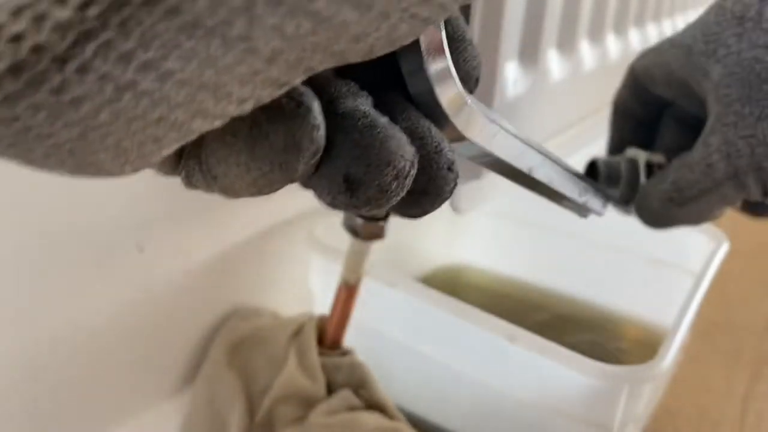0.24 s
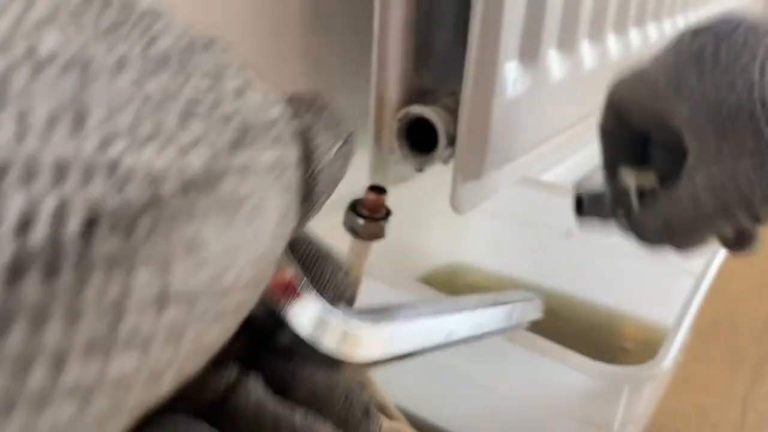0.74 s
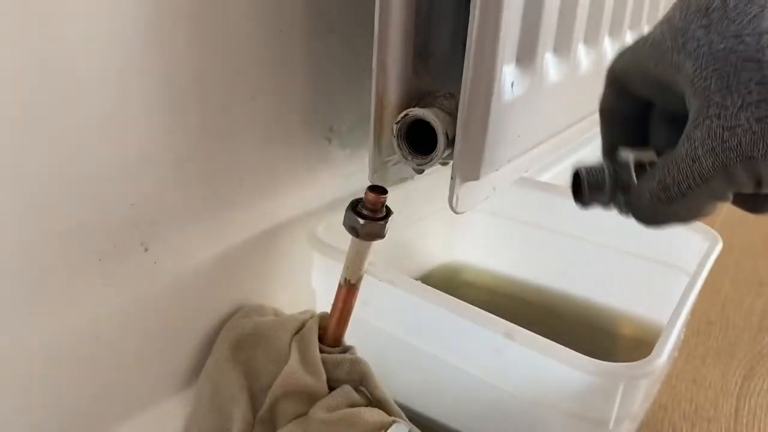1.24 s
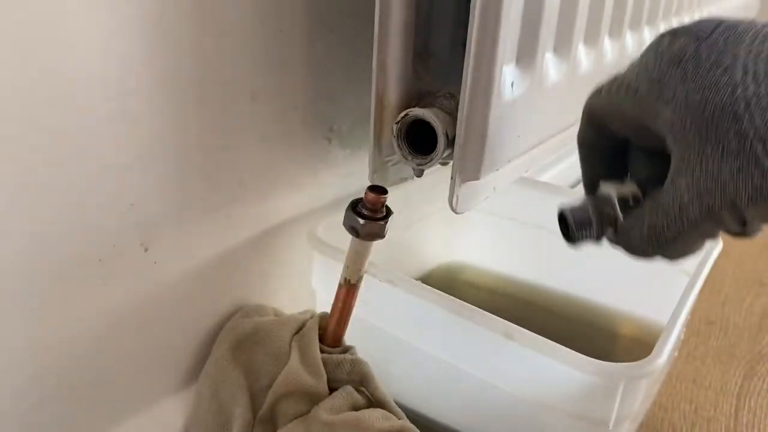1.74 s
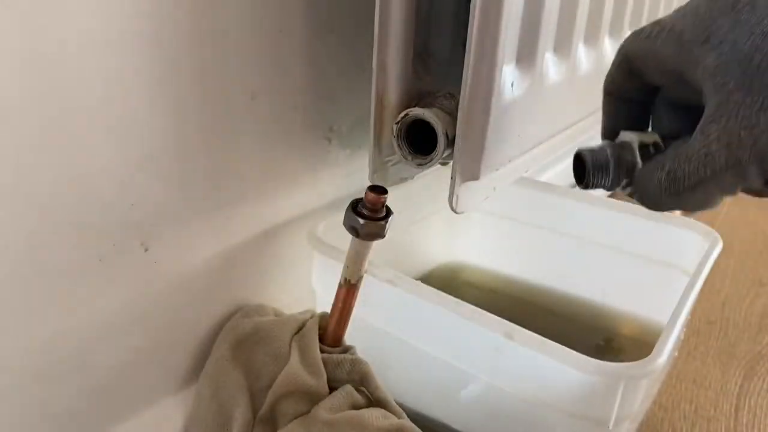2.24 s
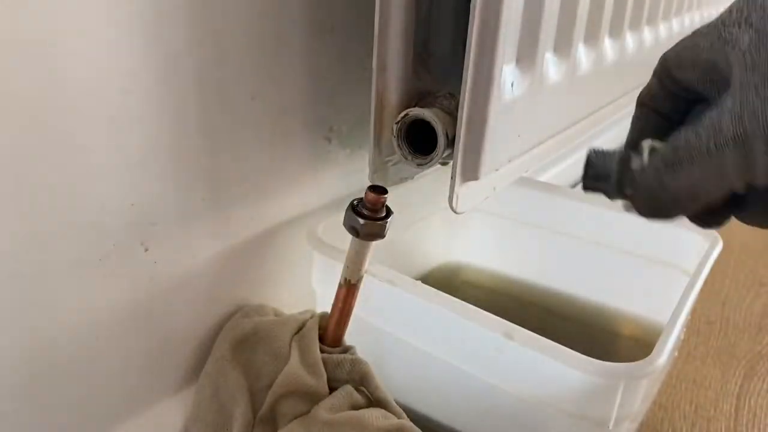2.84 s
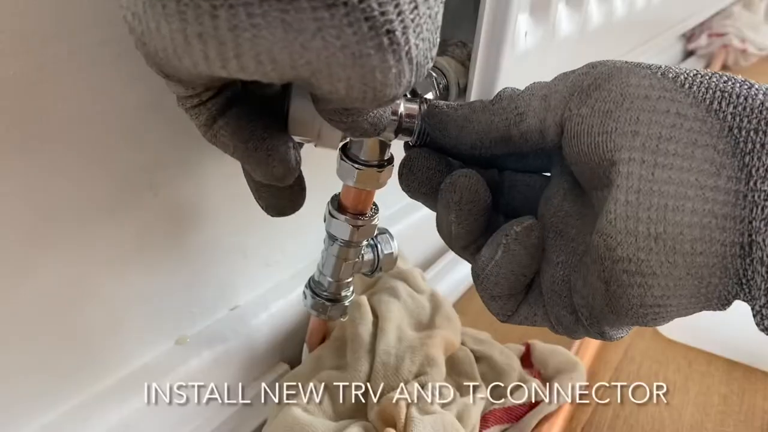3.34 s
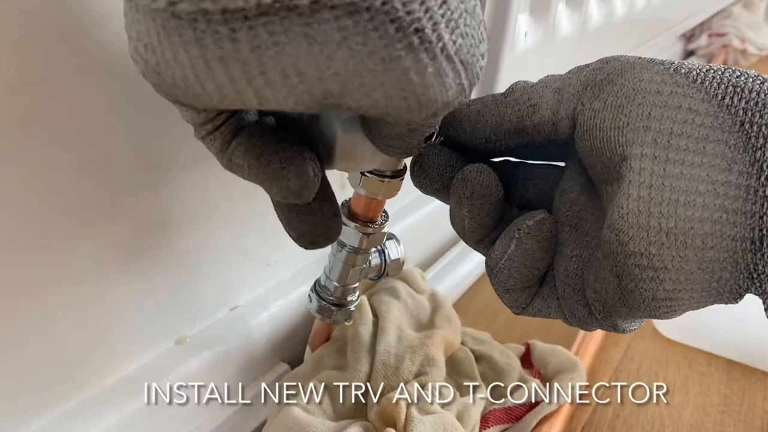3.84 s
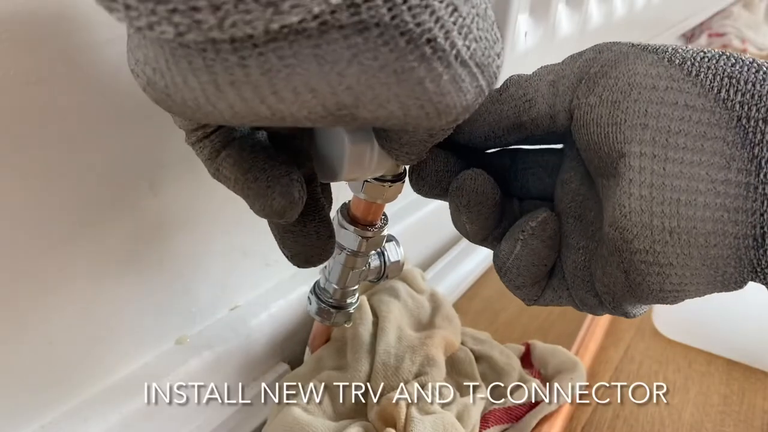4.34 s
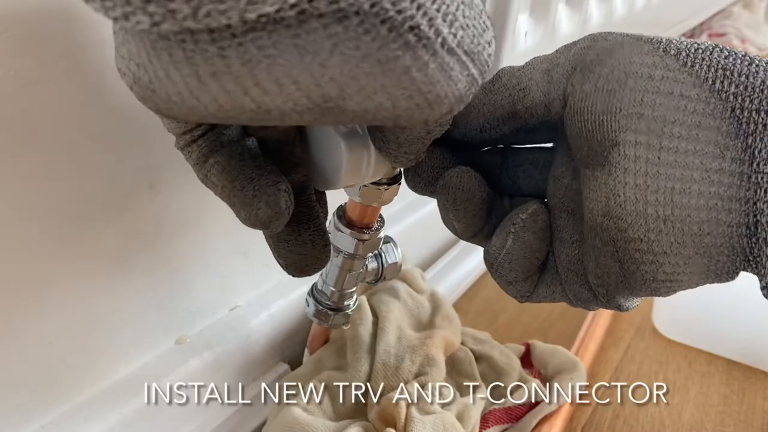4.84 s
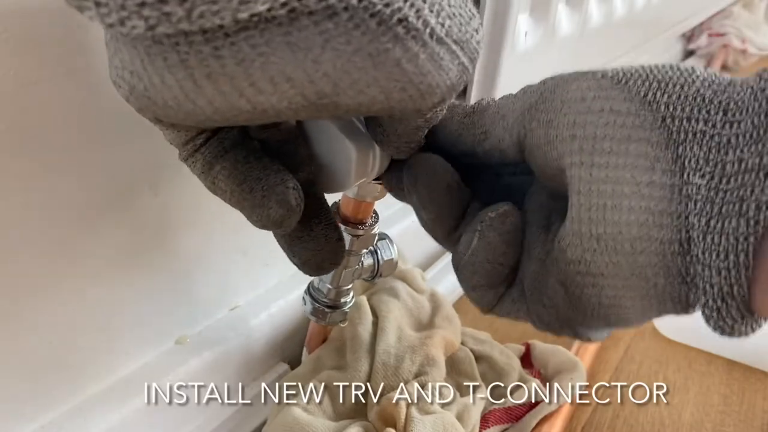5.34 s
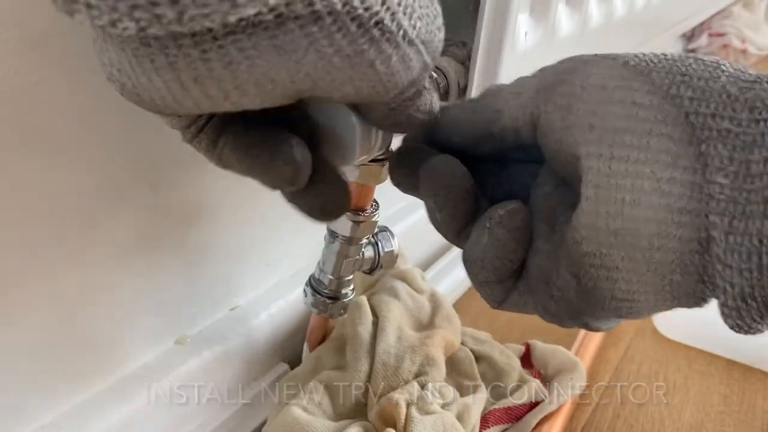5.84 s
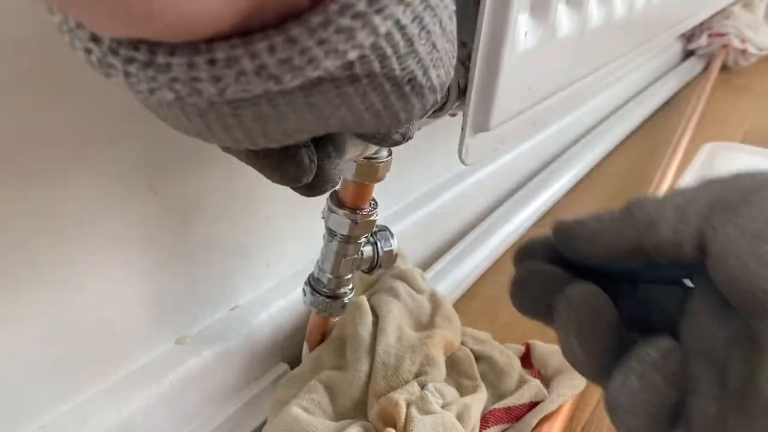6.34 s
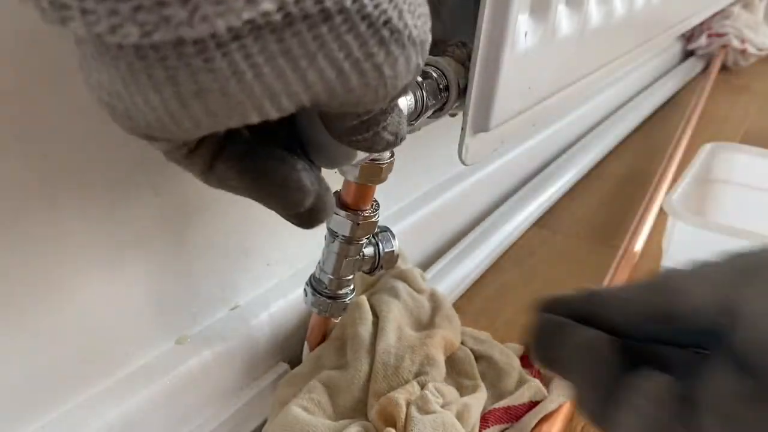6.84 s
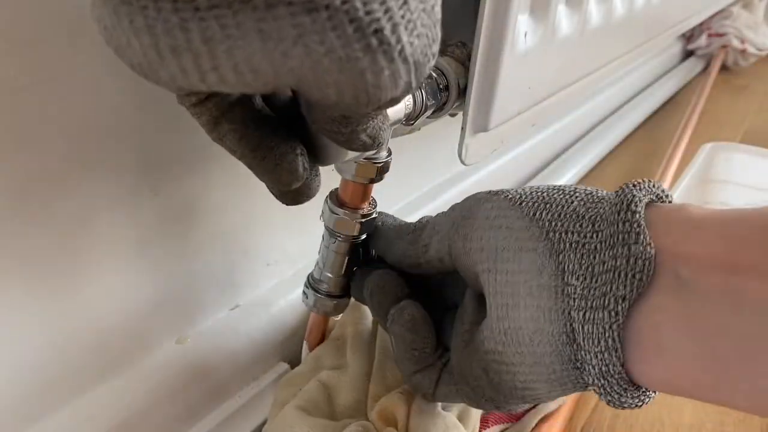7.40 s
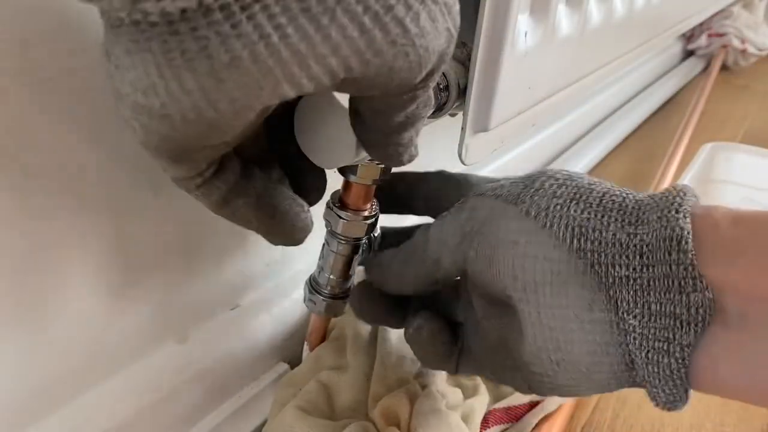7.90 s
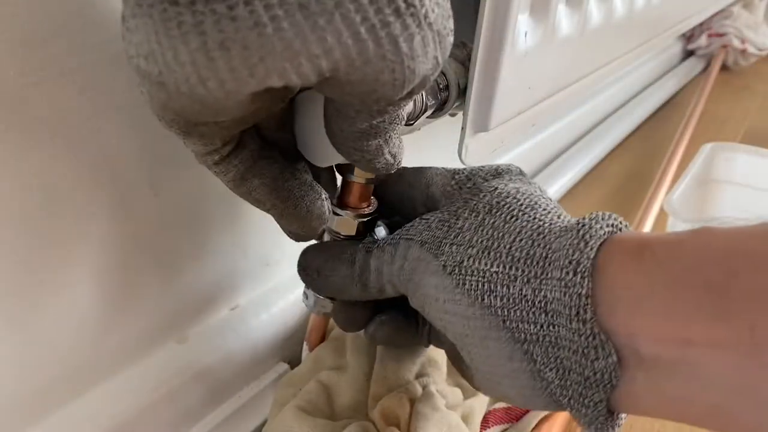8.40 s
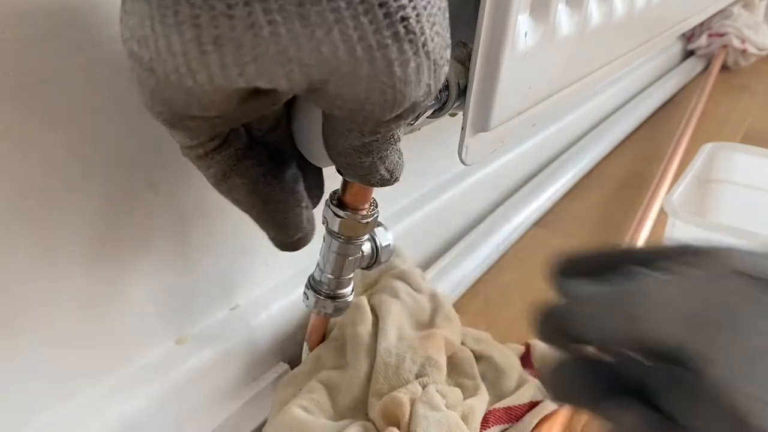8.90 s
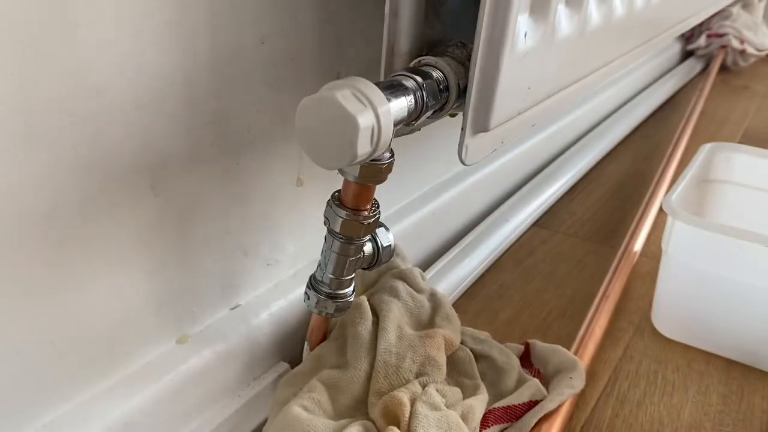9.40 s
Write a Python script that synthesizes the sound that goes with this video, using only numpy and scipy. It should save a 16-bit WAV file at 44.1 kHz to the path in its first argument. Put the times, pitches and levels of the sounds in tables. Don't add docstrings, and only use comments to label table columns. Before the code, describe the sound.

Small brass parts clink and rattle in gloved hands, a heavy tool thumps onto floorboards, then thin radiator steel knocks and booms indoors.

```python
import sys
import numpy as np
from scipy import signal
from scipy.fft import rfft, irfft, next_fast_len
from scipy.io import wavfile
from scipy.ndimage import uniform_filter1d

SR = 44100
rng = np.random.default_rng(int(sys.argv[2]) if len(sys.argv) > 2 else 0)


def invert_db(level):
    return 10 ** (np.asarray(level, dtype=float) / 20)


def to_wav(sig):
    pcm = np.clip(np.atleast_2d(sig), -1, 1) * 32767
    pcm = np.round(pcm).astype(np.int16)
    wavfile.write(sys.argv[1], SR, pcm.T)


N = 426006
LONG = next_fast_len(N)
CUT_S = 2.955

# (frequency [Hz], level [dB per Hz])
RUMBLE = [(15, -40), (30, -9), (204, -4), (376, -21), (560, -16.5), (1300, -33.5), (3790, -47.5),
          (9100, -74)]
# (time [s], level [dB], t60 [s])
SWAYS = [
    (3.1, -38, 0.39),
    (4.199, -34.5, 0.98),
    (4.55, -34, 0.69),
    (4.79, -39, 2.1),
    (4.999, -35.5, 1.63),
    (5.571, -40, 2.25),
    (6.11, -36.5, 1.26),
    (6.5, -48.5, 6.1),
    (8.201, -47, 0.63),
    (8.99, -45.5, 1.9),
]
# (frequency [Hz], t60 [s])
ROOM_DECAY = [(100, 0.86), (400, 0.057), (1500, 0.46), (5000, 0.37), (16000, 0.12)]
# (frequency [Hz], share [0-1])
LIKENESS = [(60, .995), (125, .98), (250, .9), (600, .05), (1100, .35), (2000, .4), (5000, .3)]

# (frequency [Hz], level [dB per Hz])
CLOTH = [(300, -3.5), (800, -13), (1700, -5), (2800, -4), (4500, -7.5), (6500, -9.5), (9000, -32.5)]
SHEEN = [(5000, -17.5), (7500, -5.5), (11000, -6), (14000, -7.5), (15500, -12)]
# (loudest [s], rise [s], fall [s], cloth level [dB], sheen level [dB])
STROKES = [(0, .1, 0.18, -66.5, -78.5), (0.733, 0.0088, 0.063, -49, -59), (0.981, 0.18, 0.22, -49.5, -61),
           (1.1, 0.4, 0.094, -50.5, -59), (1.439, 0.22, 0.63, -59, -69.5), (1.869, .3, 0.12, -68.5, -89),
           (2.348, 0.81, 0.28, -70.5, -80.5), (5.3, 0.22, 0.039, -84.5, -80),
           (5.472, 0.016, 0.73, -69, -77), (5.908, 0.46, 0.59, -70, -76), (6.521, 0.16, 0.27, -65, -73),
           (6.93, 0.18, 0.31, -66.5, -75), (7.499, 0.28, 0.18, -77, -80), (7.77, 0.13, 0.26, -76, -73.5),
           (8.05, 0.073, 0.24, -69, -72), (8.508, 0.31, 0.6, -87.5, -82.5), (8.72, 0.19, 0.049, -62, -68.5),
           (8.95, 0.076, 0.28, -57.5, -70.5), (9.3, 0.1, 0.25, -78, -64), (9.64, 0.82, 0.32, -59.5, -66)]
# (start [s], end [s], from [Hz], to [Hz], level [dB])
GLOVE_SQUEAK = (3.48, 3.56, 6350, 6700, -83)
# (time [s], length [s], low [Hz], high [Hz], level [dB rms])
SCUFFS = [(0.464, 0.031, 1500, 12000, -47.5), (1.307, 0.11, 2000, 5970, -72),
          (1.357, 0.058, 1494, 12700, -48.5), (1.428, 0.036, 880, 12830, -42),
          (1.477, .025, 1500, 12000, -59), (1.512, .02, 1500, 12000, -53), (2.71, 0.023, 3203, 4300, -43),
          (2.71, 0.018, 6300, 8030, -52), (2.736, 0.03, 2010, 12550, -43.5),
          (2.082, 0.051, 6450, 7650, -56), (5.143, 0.044, 2200, 2700, -54), (5.2, 0.036, 3147, 3500, -63),
          (5.194, 0.026, 500, 1700, -46.5), (4.526, .02, 1104, 1800, -46.5), (3.585, .035, 1000, 1680, -53),
          (3.72, 0.051, 1097, 4860, -49.5), (3.95, 0.037, 1100, 1905, -47), (3.12, 0.042, 1130, 1620, -53),
          (3.302, 0.025, 1150, 1550, -62), (8.496, 0.047, 600, 3940, -59.5),
          (2.774, 0.021, 1280, 12500, -48), (2.923, 0.02, 1280, 4480, -64), (6.534, 0.059, 800, 1630, -46),
          (6.912, 0.079, 1320, 1970, -60), (7.261, 0.22, 1230, 1860, -75.5), (7.499, 0.13, 1210, 2085, -73),
          (8.128, 0.085, 1300, 2370, -66.5), (8.909, 0.2, 4300, 4900, -70), (8.924, .05, 1600, 2700, -72),
          (8.982, 0.085, 1080, 1800, -51.5), (9.206, .07, 2100, 3000, -75), (9.3, 0.13, 1990, 2790, -69),
          (9.525, 0.032, 1220, 1970, -59.5), (9.58, 0.056, 2130, 3300, -63)]
# (time [s], length [s], low [Hz], high [Hz], level [dB rms])
TICKS = [(0.413, .003, 1500, 2400, -56), (0.423, 0.0028, 1500, 5460, -53.5),
         (1.217, .003, 2500, 15000, -64.5), (1.239, .002, 6000, 15000, -70.5),
         (1.271, 0.0025, 2500, 15000, -65.5), (1.293, 0.0029, 2500, 14900, -66),
         (1.338, 0.0035, 1500, 14600, -58.5), (1.592, 0.0025, 2010, 8000, -59.5),
         (1.648, .003, 1490, 12000, -53), (2.357, 0.0023, 1490, 7000, -65.5),
         (2.7, 0.0068, 2540, 12000, -66.5), (2.82, 0.0061, 1470, 12000, -55),
         (2.895, 0.0035, 3200, 4200, -54), (2.944, 0.0037, 1200, 12000, -56),
         (4.511, 0.0094, 400, 3500, -52), (6.686, 0.0054, 1083, 1700, -63.5),
         (7.196, 0.0053, 806, 2630, -67.5), (8.021, 0.0041, 1190, 2010, -66),
         (8.092, .005, 1300, 2080, -63), (8.16, 0.0058, 600, 2680, -53), (8.192, 0.0091, 794, 2180, -45.5),
         (2.482, 0.011, 3500, 4250, -57), (8.26, 0.0028, 9990, 15300, -72), (8.346, 0.0071, 700, 1800, -64),
         (8.571, 0.0022, 3970, 16000, -67), (8.584, 0.0024, 6000, 16000, -63),
         (9.281, 0.0031, 3200, 6500, -57), (9.645, 0.0043, 3800, 5500, -53.5),
         (9.281, 0.0081, 546, 1080, -51), (9.641, 0.0043, 1610, 2500, -53), (1.518, .008, 1497, 2187, -44),
         (0.229, 0.0052, 3260, 4200, -49), (.274, 0.0034, 3000, 4300, -51)]
# (time [s], frequency [Hz], level [dB])
PINGS = [
    (1.11, 1800, -41),
    (1.4343, 5330, -25),
    (5.753, 4820, -24.5),
    (5.146, 2400, -46),
    (5.147, 3290, -49),
    (6.537, 1360, -39),
    (6.934, 1740, -45.5),
    (8.646, 2574, -35),
    (9.541, 1490, -48.5),
    (9.563, 3000, -43.5),
]

# (frequency [Hz], level [dB], t60 [s])
FLOORBOARD = [(170, -10, .11), (265, -5.5, 0.14), (300, -2.5, .09), (400, -9.5, 0.12), (468.6, -8, 0.14),
              (544.5, -8.5, 0.12), (740, -4, 0.077), (870, -17, .12), (1140, -16, .1), (1320, -22, .1),
              (1800, -28.5, .1)]
KEY = [(2650, -3, .008), (3570, -3, .008), (4156, -23, .42), (5150, -14, .007)]
BRASS_MAIN = [(6500, -4.5, .008), (6870, -3.5, 0.027), (6920, -5, 0.016), (6920, -1.5, 0.011),
              (7680, -4, 0.0066)]
BRASS_LOW = [(3240, -5.5, 0.01), (3600, -0.5, 0.007), (3810, -1, 0.01), (4030, -7, .006),
             (5400, -11.5, 0.0042)]
BRASS_TOP = [(14600, -11.5, .22), (14800, -4, .06), (14680, -3.5, .04)]
BRASS_BODY = [(1500, -2, .005), (1850, 0, .007), (2400, -2, .005)]
BRASS_SHINE = [(9670, -2, 0.0042), (11150, -3.5, 0.006), (11430, -2, 0.015), (12000, -4, 0.0059)]
NUT = [(8750, -10.5, 0.16), (8770, 2, 0.15), (14910, -31.5, .2), (14900, -33.5, 0.036)]
# (time [s], peak [dB], ring near 3.8 kHz [dB], top ring [dB])
FREEING = [(0.2299, -46.5, -53.5, -79), (0.275, -54.5, -45.5, -72), (0.304, -34.5, -41, -62),
           (0.3296, -43.5, -41, -64), (0.337, -36, -39.5, -43), (0.4659, -24, -45, -36.5),
           (0.4705, -21.5, -44, -31.5), (0.5409, -30, -46.5, -45), (0.5774, -33, -42, -40),
           (0.589, -52, -51, -58), (0.7263, -48, -51, -71), (0.82, -42, -46, -68), (1.024, -45, -44, -62)]
RATTLING = [(1.361, -36.5, -43, -51), (1.376, -27.5, -47.5, -24), (1.3974, -36, -50, -48),
            (1.4287, -35, -62.5, -52.5), (1.4349, -37, -36.5, -45.5), (1.445, -39.5, -57, -58),
            (1.483, -41, -55.5, -55), (1.5189, -34.5, -45, -54), (1.6078, -46, -51.5, -60),
            (1.6527, -33.5, -44.5, -55), (1.663, -30, -46, -60)]
ROLLING = [(2.049, -40, -44, -43.5), (2.068, -32.5, -44, -55.5), (2.4269, -36.5, -46.5, -54.5),
           (2.453, -52.5, -53, -93), (2.4875, -47, -55.5, -89), (2.7116, -50, -43, -57.5),
           (2.7333, -25, -37.5, -39), (2.7422, -37.5, -42.5, -16), (2.777, -37.5, -44.5, -42.5),
           (2.8904, -43.5, -49, -61), (2.928, -59, -67, -81)]
# (freeing [dB], rattling [dB], rolling [dB])
BRASS_BODY_DB = (-3, 2, -3)

PANEL_HZ = [184, 281, 620, 845, 925, 1071, 1165, 1325, 1483, 1733, 2360, 2665, 3460, 4670]
# (level [dB], t60 [s])
PANEL_RING = [(-11, .3), (-7, .27), (-5, .25), (-8, .25), (-8, .13), (-8, .2), (-11, .2), (0, .19),
              (-6, .15), (-1, .17), (-5, .13), (-4, .1), (-7, .09), (-17, .08)]
# (frequency [Hz], level [dB], t60 [s])
SHEET = [(106, -11.5, 0.91), (203, -11, .6), (420, -6, 0.31), (1320, -9, 0.39), (3000, -4.5, 0.2),
         (5225, -5.5, 0.27), (7160, 9.5, 0.13), (16000, -2, 0.072)]
# (frequency [Hz], level [dB])
CROWD = [(400, -2), (700, 3), (1000, -6.5), (1600, -2), (2100, -1), (3400, -0.5), (4100, 2.5), (5000, 4)]
# (frequency [Hz], width [Hz], level [dB])
BUNCHES = [(920, 90, 2.5), (2050, 130, -3), (2550, 220, 4), (3050, 120, -4), (3420, 220, 3.5),
           (4250, 220, -4), (4680, 160, 1.5)]
# (time [s], frequency [Hz], level [dB])
FAVOURED = [(3.199, 3320, -43), (3.2, 2530, -50), (3.3, 3350, -51), (3.628, 3340, -49), (3.63, 940, -47),
            (3.701, 2420, -57), (3.703, 3290, -48), (3.951, 1357, -31), (4.254, 2640, -31.5),
            (4.26, 1330, -26), (4.555, 1360, -23), (6.112, 327, -36), (5.579, 1690, -28),
            (4.548, 3400, -35), (4.549, 2170, -29.5), (4.792, 1700, -30.5), (4.988, 1750, -28),
            (5.222, 614, -38.5), (5.225, 940, -43.5), (5.549, 870, -31), (5.578, 3350, -28.5),
            (5.63, 930, -33), (5.752, 3340, -29), (5.753, 4686, -17.5), (5.76, 527, -33.5),
            (8.418, 950, -49), (8.418, 2280, -48), (8.497, 3330, -63), (8.647, 2700, -37.5),
            (8.647, 1147, -36.5), (8.721, 2340, -39), (0.001, 1800, -51.5)]
# (time [s], peak [dB], boom [dB], edge [dB], spark [dB])
KNOCKS = [(4.13, -43, -53, -66.5, -72), (4.252, -9.5, -38, -30, -51), (4.546, -9.5, -40.5, -27, -47),
          (4.789, -12.5, -38, -40.5, -66), (4.985, -9, -35.5, -29, -52), (5.144, -40.5, -55, -50.5, -99.5),
          (5.203, -29.5, -46, -56, -79), (5.257, -39, -55, -53, -100), (5.577, -13.5, -40, -22, -47.5),
          (5.628, -24.5, -38.5, -29.5, -56), (5.751, -20.5, -38, -24, -21), (6.034, -39, -48.5, -71, -64.5),
          (6.111, -37, -31, -55.5, -66.5), (6.527, -26.5, -48.5, -53, -81.5),
          (8.646, -27.5, -52.5, -40, -54.5), (8.721, -38, -66.5, -49.5, -104),
          (8.986, -29, -52, -59.5, -64), (9.559, -79, -59, -80, -38)]
# (time [s], peak [dB], boom [dB], edge [dB])
SEATING = [(2.981, -41.5, -72, -66.5), (3.084, -37.5, -54, -83), (3.117, -34, -40, -47),
           (3.133, -56, -55, -38), (3.202, -40.5, -83, -51.5), (3.299, -44.5, -87, -54.5),
           (3.589, -35.5, -58, -80), (3.626, -36.5, -53, -47), (3.699, -31, -48, -39),
           (3.85, -50.5, -66.5, -52), (3.919, -52, -54.5, -47.5), (3.948, -27, -55.5, -53.5)]
# (time [s], peak [dB], boom [dB], edge [dB])
SLIDES = [
    (4.24, -29, -40.5, -50.5),
    (4.526, -22, -48.5, -47.5),
    (4.533, -34, -37.5, -48),
    (5.474, -46, -42, -74),
    (5.545, -20, -42.5, -46),
    (5.737, -26, -58, -27.5),
    (9.283, -57, -50, -55),
]
# (time [s], peak [dB], boom [dB], edge [dB])
TOUCHES = [(.743, -50, -50, -49), (1.118, -45.5, -79, -58), (1.443, -59, -48.5, -51),
           (6.93, -45, -52.5, -60), (7.299, -58.5, -63, -82), (7.539, -51, -61, -85.5),
           (7.794, -43, -50, -92.5), (8.047, -49.5, -67.5, -74), (8.163, -46.5, -55, -79),
           (8.193, -41.5, -53.5, -64), (8.417, -40, -60.5, -74), (8.496, -37.5, -73.5, -59),
           (9.541, -60, -84.5, -47)]
# (spark above edge [dB], contact [ms])
SEAT_MANNER = (-41, 5.7)
SLIDE_MANNER = (-9, 25)
TOUCH_MANNER = (-20.5, 1.7)
# (time [s], level [dB])
NUT_TAPS = [
    (3.624, -44),
    (5.578, -51.5),
    (5.751, -36.5),
    (8.645, -14),
]
# (low [Hz], high [Hz])
OPPOSED_HZ = ((8400, 9600), (12700, 13900))


def on_log(hz, table, column=1):
    table = np.array(table)
    return np.interp(np.log(np.maximum(hz, 1)), np.log(table[:, 0]), table[:, int(column)])


def unit(x):
    return x / np.sqrt(np.mean(x ** 2))


def walk(rate):
    hold = int(SR / rate)
    return uniform_filter1d(np.repeat(rng.standard_normal(N // hold + 1), hold), hold)[:N]


def hiss(colour):
    hz = np.fft.rfftfreq(LONG, 1 / SR)
    mid, side = rfft(rng.standard_normal((2, LONG)))
    like = np.clip(on_log(hz, LIKENESS), 0, 1)
    pair = np.sqrt(1 + like) * mid + np.sqrt(1 - like) * side * np.array([[1], [-1]])
    return unit(irfft(pair * invert_db(on_log(hz, colour)), LONG)[:, :N])


def half_octave(hz, x):
    band = signal.butter(2, [hz / 2 ** .25, hz * 2 ** .25], "band", fs=SR, output="sos")
    return signal.sosfilt(band, x)


def ring(modes, spread_db=-2.0, detune=0., size=SR // 2):
    hz, db, t60 = np.transpose(modes)
    chance = rng.standard_normal((len(hz), 6)).T
    t = np.arange(size)[:, None] / SR
    turning = 2j * np.pi * hz * (1 + detune * chance[4])
    damping = np.log(1000) / np.maximum(t60, .005)
    decay = np.exp(t * (turning - damping)) * (1 - np.exp(-t / 0.000096))
    apart = np.sqrt(-np.log(np.clip(on_log(hz, LIKENESS), .02, 1)) / 2)
    level = invert_db(db + spread_db * chance[5] + 0.58 * chance[:2])
    out = (level * np.exp(1j * apart * chance[2:4])) @ decay.T
    return out.imag / np.abs(out.imag).max()


def blows(times, db, contact_ms):
    out, t = np.zeros(N + 4096), np.arange(4096) / SR
    for s, level, ms in zip(times, db, np.clip(contact_ms, .1, 20)):
        along = t * 1000 / ms
        ticks = rng.standard_normal(4096) * rng.exponential(size=4096) * along ** 0.97 * np.exp(-along)
        out[int(s * SR):][:4096] += invert_db(level) * ticks / np.sqrt(np.sum(ticks ** 2))
    return out[None, :N]


def strike(force, response):
    return signal.fftconvolve(force, response, axes=1)[:, :N]


def crack(force, low_hz, high_hz):
    band = signal.butter(2, [low_hz, min(high_hz, .45 * SR)], "band", fs=SR, output="sos")
    return signal.sosfilt(band, signal.sosfilt(band, force))


def bunching(hz):
    return sum(db * np.exp(-((hz - centre) / width) ** 2) for centre, width, db in BUNCHES)


def room(x):
    t, tail = np.arange(SR // 2) / SR, 0
    for hz in 100 * 2 ** np.arange(0, 7.6, .5):
        noise = half_octave(hz, rng.standard_normal((2, len(t))))
        tail = tail + noise * 1000 ** (-t / on_log(hz, ROOM_DECAY))
    tail = tail * np.clip(t / 0.0027, 0, 1)
    return strike(x.mean(axis=0, keepdims=True), tail / np.sqrt(np.sum(tail ** 2) / 2))


def house(t):
    swell = invert_db(-56)
    for s, db, t60 in SWAYS:
        after = np.maximum(t - s, 0)
        build = 1 - np.exp(-(after / 0.049) ** 2)
        swell = np.hypot(swell, invert_db(db + 2.5) * build * invert_db(-60 * after / max(t60, .1)))
    hum = hiss([(35, -35), (52, 9.5), (70, 16), (85, 9.5), (120, -53.5)]) * swell
    return hum + invert_db(-56.5 + 2.0 * walk(4.5)) * hiss(RUMBLE)


def sleeves(t):
    s, rise, fall, cloth_db, sheen_db = np.transpose(STROKES)[:, :, None]
    steps = t[::64]
    distance = np.maximum((s - steps) / np.maximum(rise, .01), (steps - s) / np.maximum(fall, .01))
    shape_db = -20 * distance ** 1.1

    def swell(db):
        return np.interp(t, steps, np.sqrt(np.sum(invert_db(db + shape_db) ** 2, axis=0)))

    grain_db = 1.6 * walk(40) + 0.83 * walk(350)
    cloth = invert_db(grain_db) * swell(cloth_db) * hiss(CLOTH)
    return cloth + invert_db(grain_db + 5.0) * swell(sheen_db) * hiss(SHEEN)


def squeak(t):
    start, end, from_hz, to_hz, db = GLOVE_SQUEAK
    along = np.clip((t - start) / (end - start), 0, 1)
    phase = 2 * np.pi * np.cumsum(from_hz + (to_hz - from_hz) * along) / SR
    return invert_db(db) * np.sin(np.pi * along) * np.sin(phase)


def scuffs():
    out = np.zeros((2, N + SR))
    for s, length, low_hz, high_hz, db in SCUFFS + TICKS:
        mid, side, grit = rng.standard_normal((3, 8192))
        if s > CUT_S:
            mid, side = irfft(rfft([mid, side]) * invert_db(bunching(np.fft.rfftfreq(8192, 1 / SR))))
        along = np.clip(np.arange(8192) / SR / max(length, .001), 0, 1)
        grit_db = 5 * 4.3 * uniform_filter1d(grit, size=36)
        shape = np.sin(np.pi * along ** .55) ** 1.5 * invert_db(grit_db)
        rub = crack((mid + .5 * side * np.array([[1], [-1]])) * shape, low_hz, high_hz)
        out[:, int(s * SR):][:, :8192] += invert_db(db) * rub / np.sqrt(np.sum(rub ** 2) / 2 / (length * SR))
    return out[:, :N]


def pings(table, t60, apart):
    out = np.zeros((2, N + 8192))
    for s, hz, db in table:
        pair = ring([(hz, 0, t60), (hz * apart, -4, t60)], size=6144)
        push = blows([0], [db], [1.5])[:, :512]
        out[:, int(s * SR):][:, :6655] += signal.fftconvolve(push, pair, axes=1)
    return out[:, :N]


def key_drop():
    drop_s, drop_db = 1.99, -3.5
    t = np.arange(1024) / SR
    turns = 350 * t + 1.1 * (1 - np.exp(-t / 0.00077))
    lean = .4 * np.array([[1], [-1]])
    thump = -np.sin(2 * np.pi * turns + lean) * np.clip(t / 0.00089, 0, 1) * np.exp(-(t / 0.006) ** 4)
    force = np.zeros((1, N))
    force[0, int(drop_s * SR)] = invert_db(drop_db)
    board = invert_db(-12.0) * ring(FLOORBOARD) + invert_db(-16.0) * ring(KEY, spread_db=-5.5)
    contact = crack(blows([drop_s], [-9], [3.0]), 1200, 9900)
    return strike(force, thump * invert_db([[.6], [-.6]])) + strike(force, board) + contact


def brass():
    s, main, low, top = np.transpose(FREEING + RATTLING + ROLLING)
    body = low + np.repeat(BRASS_BODY_DB, [len(FREEING), len(RATTLING), len(ROLLING)])
    shine = main + .6 * (top - main) - 4
    ms = np.full(len(s), .9)
    out = crack(blows(s, low + .6, ms), 1800, 15000)
    out = out + strike(blows(s, top + 3, ms), ring(BRASS_TOP, spread_db=2.0))
    # (level [dB], modes, shift of pitch from clink to clink)
    groups = ((main + 2.5, BRASS_MAIN, .012), (low + 9.1, BRASS_LOW, .025),
              (body + 6, BRASS_BODY, .1), (shine + 8, BRASS_SHINE, .03))
    for db, modes, shift in groups:
        force = blows(s, db, ms)
        for start in (s * SR).astype(int):
            push = force[:, start:start + 200]
            answer = ring(modes, 2.7, shift, size=4096)
            out[:, start:start + 4295] += signal.fftconvolve(push, answer, axes=1)
    return out


def contacts():
    rows = [(*row, 2.3) for row in KNOCKS]
    manners = ((SEATING, SEAT_MANNER), (SLIDES, SLIDE_MANNER), (TOUCHES, TOUCH_MANNER))
    for table, (spark_db, ms) in manners:
        rows += [(s, peak, boom, edge, edge + spark_db, ms) for s, peak, boom, edge in table]
    return np.transpose(rows)


def sheet(s, colours, ms):
    crowd_hz = np.geomspace(50, 20000, 500)
    crowd_db = on_log(crowd_hz, CROWD) + bunching(crowd_hz) + 2.2 * rng.standard_normal(len(crowd_hz))
    air, out = hiss(np.c_[crowd_hz, crowd_db]), 0
    t = np.arange(4096) / SR
    for k, hz in enumerate(110 * 2 ** np.arange(0, 7.5, .5)):
        power = np.zeros(N + 4096)
        for start, colour, length in zip(s, colours, np.clip(ms, .3, 20) / 1000):
            feed = np.exp(-t / length) * (1 - np.exp(-t / length / 0.64)) / (length * SR / 1.365)
            power[int(start * SR):][:4096] += invert_db(2 * on_log(hz, colour)) * feed
        keep = 1e6 ** (-1 / (on_log(hz, SHEET, column=2) * SR))
        stored = signal.lfilter([1], [1, -keep], power[:N])
        level = invert_db(on_log(hz, SHEET)) * np.sqrt(stored) * invert_db(0.98 * walk(90))
        out = out + (-1) ** k * level * unit(half_octave(hz, air))
    return out


def panel_modes(s, db, ms, edge_db):
    out, (mode_db, t60) = np.zeros((2, N + SR)), np.transpose(PANEL_RING)
    for start, level, length, edge in zip(s, db, ms, edge_db):
        push = blows([0], [level], [length])[:, :4096]
        soft_db = .6 * min(edge + 22, 0)
        dull_db = on_log(PANEL_HZ, [(1800, 0), (2400, soft_db - 1.5)])
        answer = ring(np.c_[PANEL_HZ, mode_db + dull_db, t60], 1.5, .003, size=12288)
        out[:, int(start * SR):][:, :16383] += signal.fftconvolve(push, answer, axes=1)
    return out[:, :N]


def radiator():
    s, mid, boom, edge, spark, ms = contacts()
    colours = [((250, b), (1200, m - 12), (4000, e - 3), (7000, (e + a) / 2 - 12), (11000, min(a - 3, e - 15)))
               for m, b, e, a in zip(mid, boom, edge, spark)]
    out = sheet(s, colours, ms) + panel_modes(s, mid - 4.5, ms, edge - mid)
    out += crack(blows(s, mid + 1.2, 0.2 * ms), 1200, 3200)
    out += crack(blows(s, edge + 17, 0.42 * ms), 1400, 6500)
    out += crack(blows(s, spark + 14, 0.94 * ms), 7000, 18000)
    taps, tap_db = np.transpose(NUT_TAPS)
    return out + strike(blows(taps, tap_db, np.full(len(taps), 1.5)), ring(NUT))


def scene():
    t = np.arange(N) / SR
    clinks, panel, drop, rubs = brass(), radiator(), key_drop(), scuffs()
    panel = panel + pings(FAVOURED, .075, .985)
    first = clinks + drop + room(invert_db(-9.5) * clinks + invert_db(-5.5) * drop)
    first = first * (t < CUT_S)
    second = panel + room(invert_db(-14) * panel + invert_db(-9.5) * rubs)
    handling = sleeves(t) + squeak(t) + pings(PINGS, 0.022, 1.0) + rubs
    join = 1 - .95 * np.exp(-((t - CUT_S) / .016) ** 2)
    return join * (first + second + handling + house(t))


def band_limit(x):
    return signal.sosfilt(signal.butter(12, 16820, fs=SR, output="sos"), x)


def record(dry):
    shared_hz, turn_hz, top_hz = 6890, 4134, 15600
    hz = np.fft.rfftfreq(LONG, 1 / SR)
    low_cut = hz ** 2 / (hz ** 2 + 35 ** 2)
    pair = rfft(dry, LONG) * invert_db([[.6], [-.6]]) * low_cut
    turn = 2 * np.pi * np.clip((hz - shared_hz) / turn_hz, 0, 2)
    turn = (turn - 0.1 * np.sin(2 * turn)) / 2
    for k, (low, high) in enumerate(OPPOSED_HZ):
        turn[(hz > low) & (hz < high)] = np.pi * (k + .5)
    turn = uniform_filter1d(turn, size=LONG // 150)
    fade_db = -24 * np.clip((hz - top_hz) / 400, 0, 1)
    shared = 0.63 * pair.sum(axis=0) * invert_db(fade_db) * np.exp(1j * turn * np.array([[-1], [1]]))
    share = np.clip((hz - shared_hz) / 500 + 1, 0, .95)
    mix = irfft(share * shared + (1 - share) * pair, LONG)[:, :N]
    return band_limit(mix)


dry = scene()
out = record(dry)
to_wav(out)
```